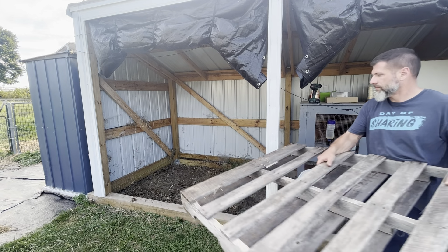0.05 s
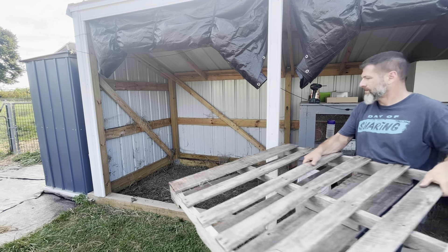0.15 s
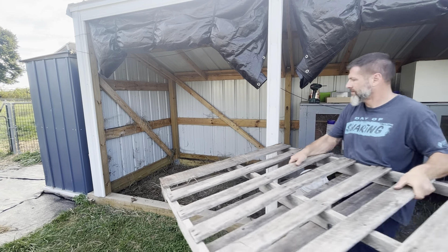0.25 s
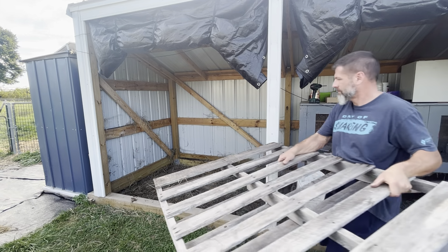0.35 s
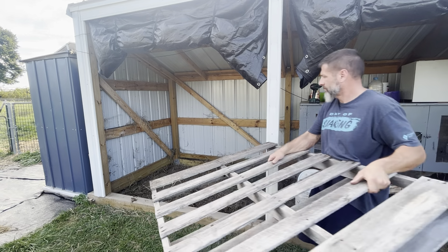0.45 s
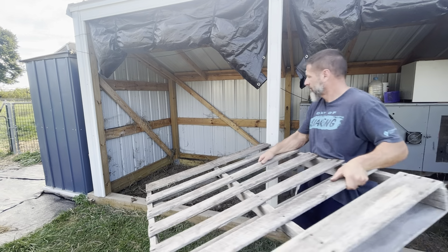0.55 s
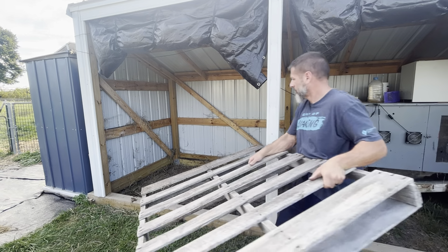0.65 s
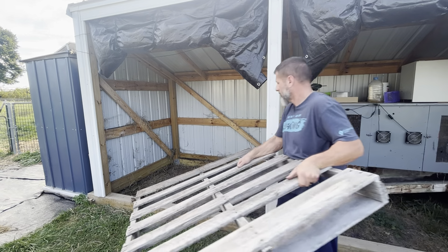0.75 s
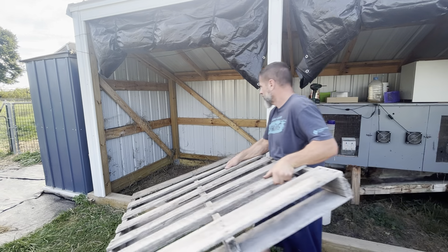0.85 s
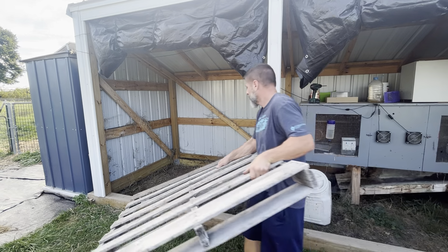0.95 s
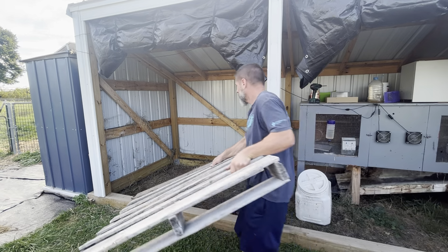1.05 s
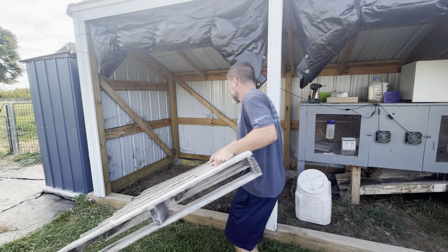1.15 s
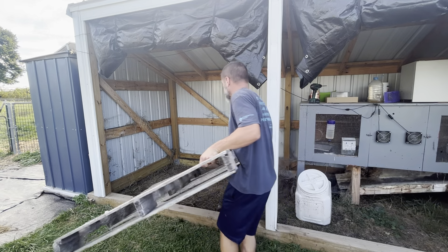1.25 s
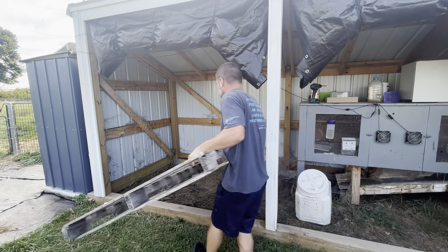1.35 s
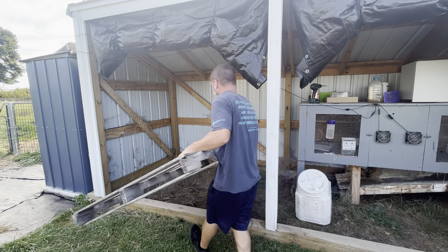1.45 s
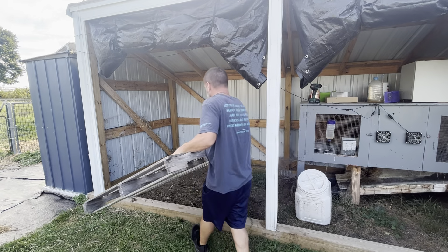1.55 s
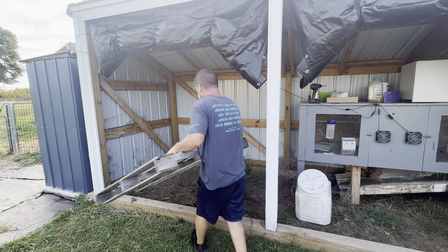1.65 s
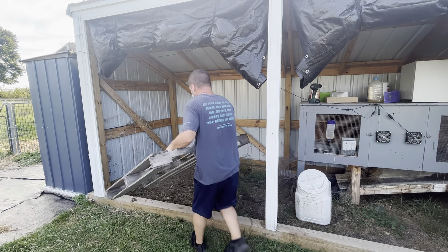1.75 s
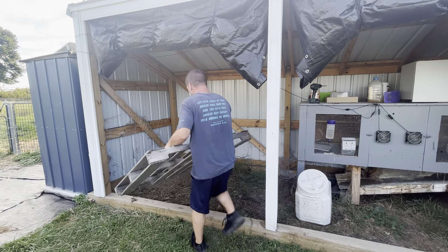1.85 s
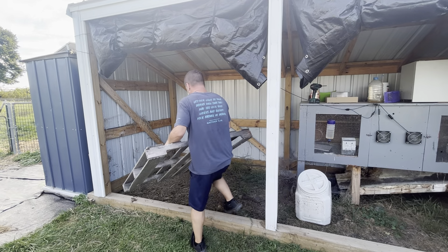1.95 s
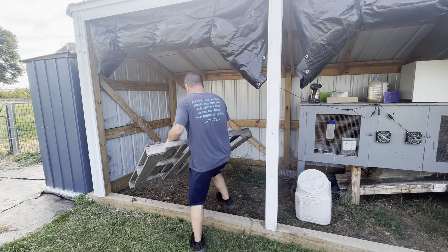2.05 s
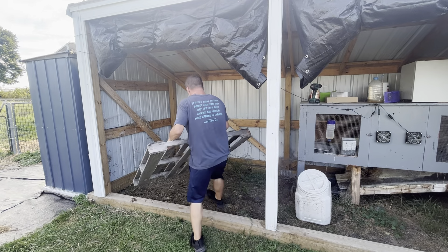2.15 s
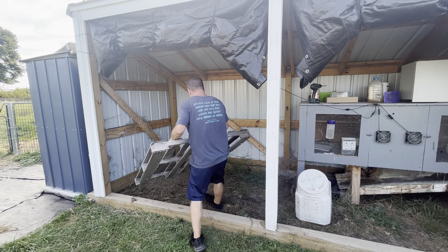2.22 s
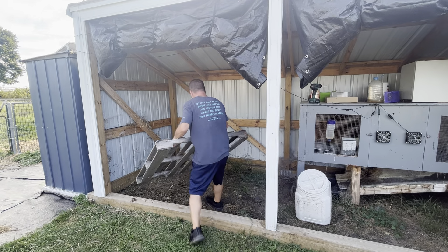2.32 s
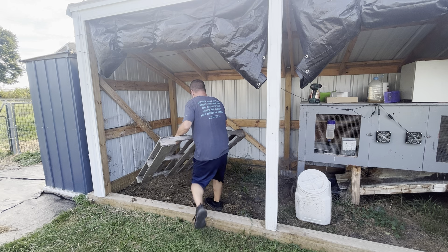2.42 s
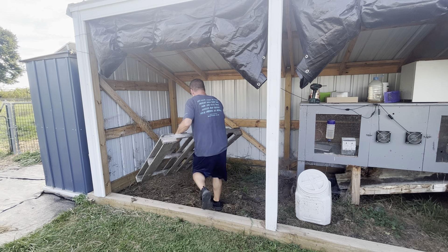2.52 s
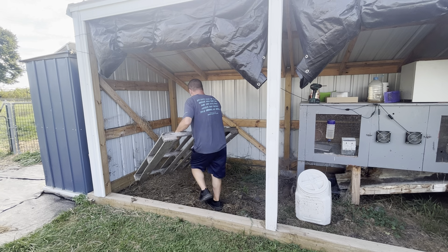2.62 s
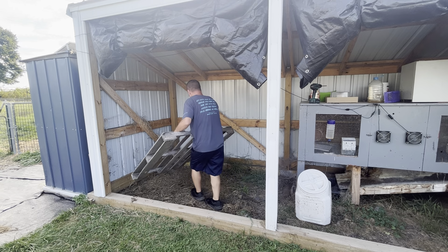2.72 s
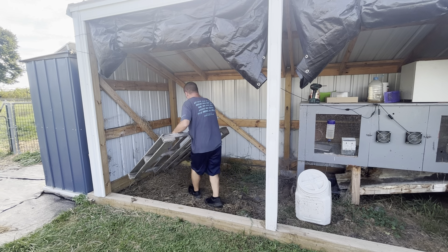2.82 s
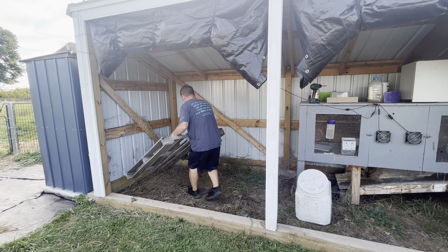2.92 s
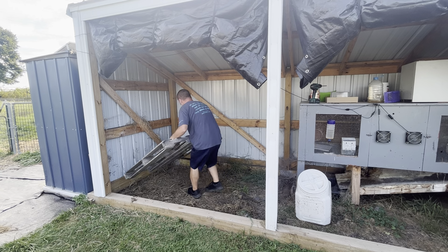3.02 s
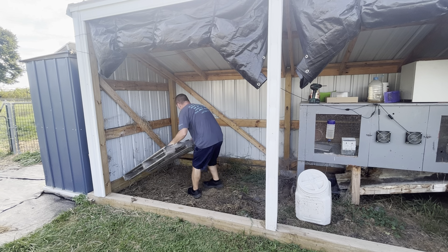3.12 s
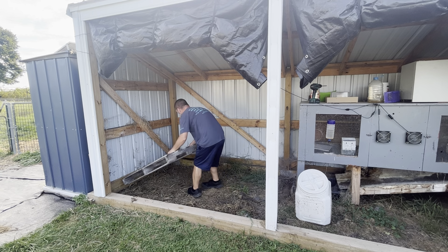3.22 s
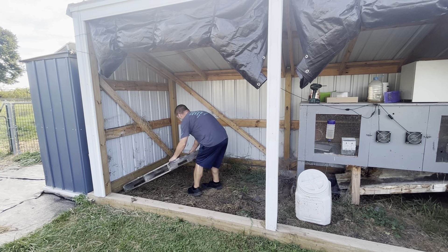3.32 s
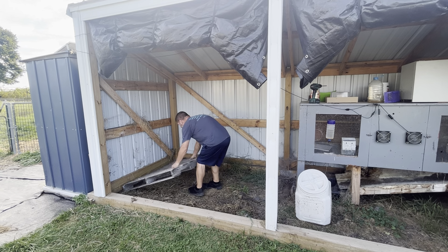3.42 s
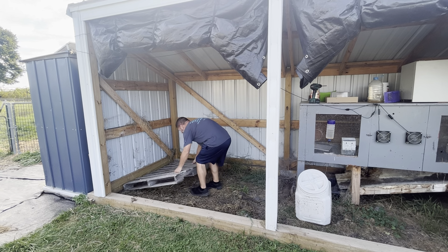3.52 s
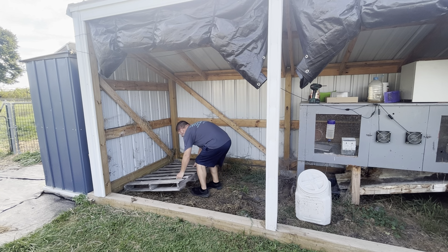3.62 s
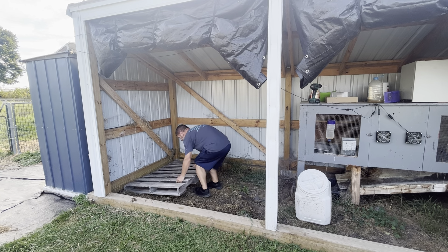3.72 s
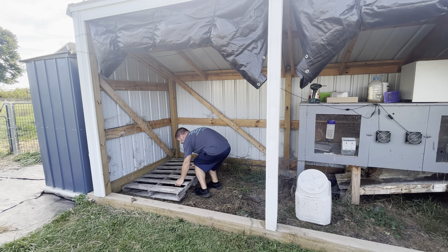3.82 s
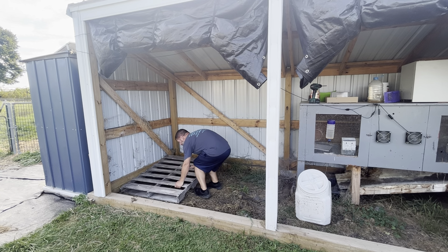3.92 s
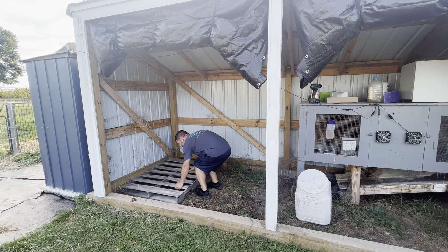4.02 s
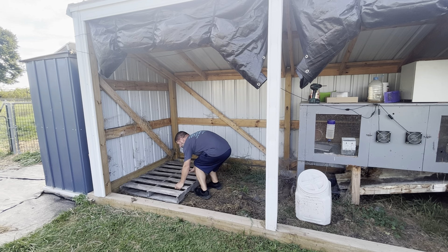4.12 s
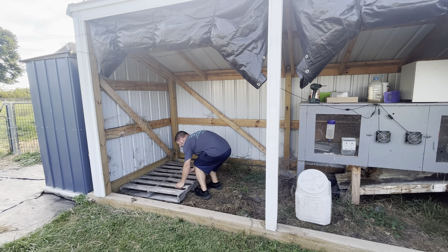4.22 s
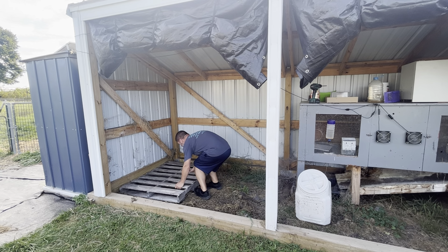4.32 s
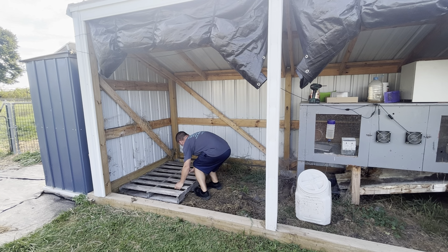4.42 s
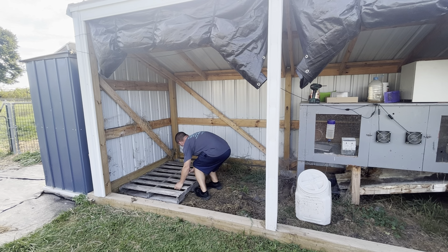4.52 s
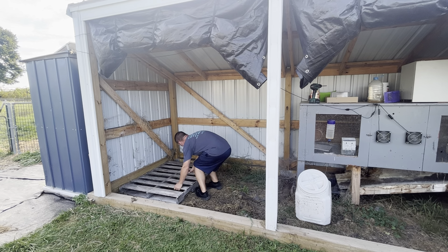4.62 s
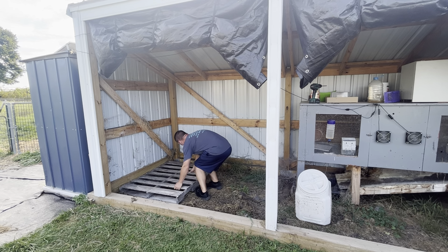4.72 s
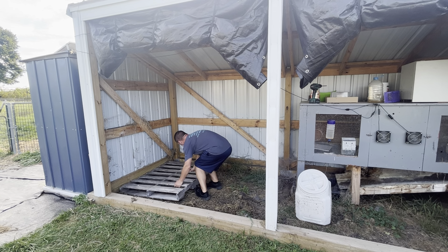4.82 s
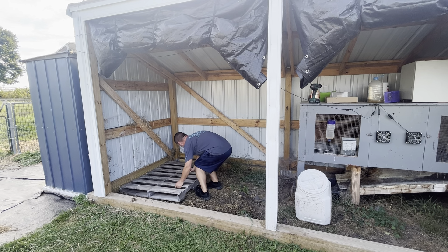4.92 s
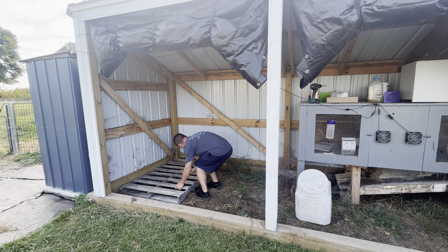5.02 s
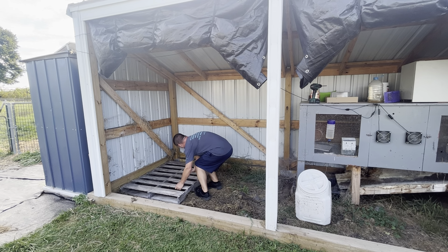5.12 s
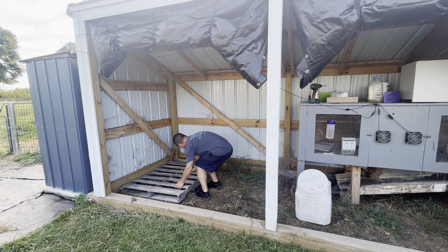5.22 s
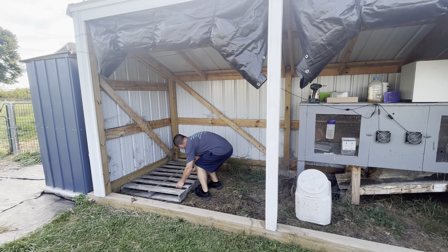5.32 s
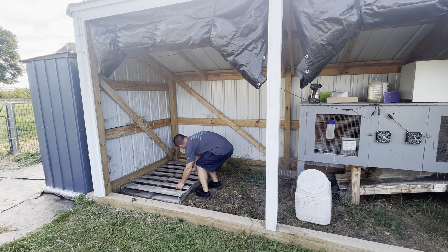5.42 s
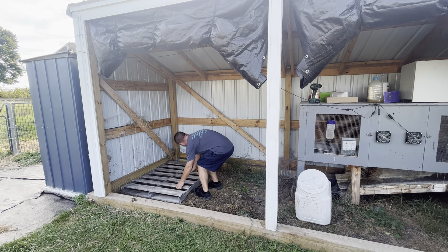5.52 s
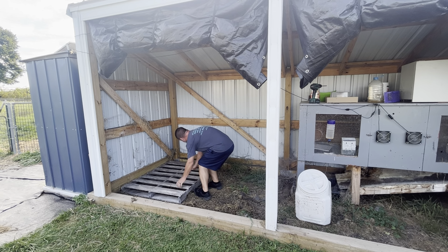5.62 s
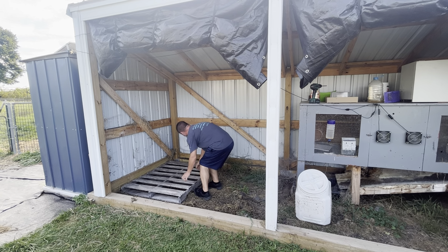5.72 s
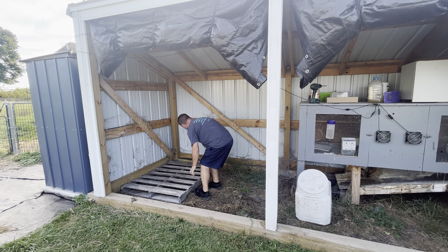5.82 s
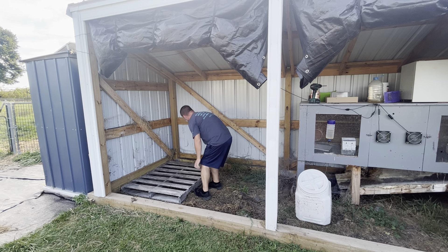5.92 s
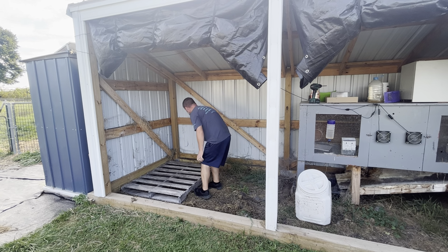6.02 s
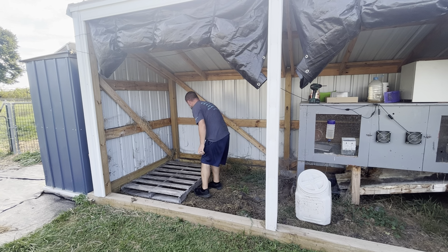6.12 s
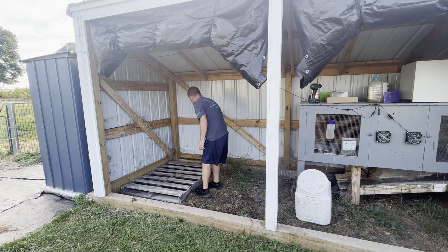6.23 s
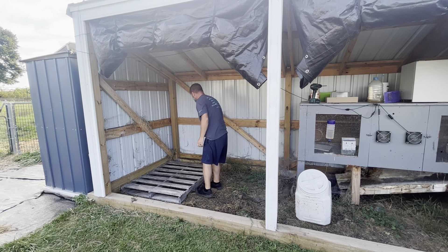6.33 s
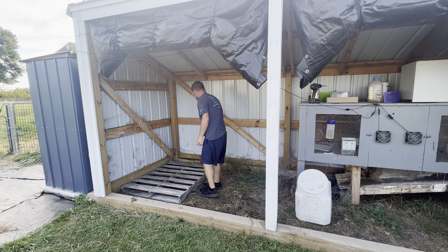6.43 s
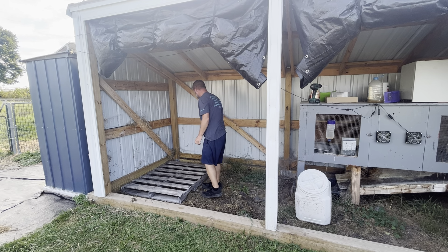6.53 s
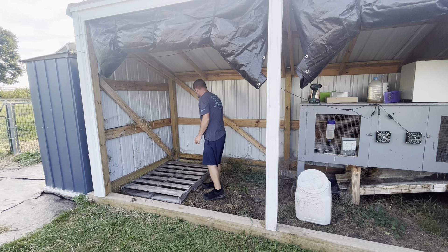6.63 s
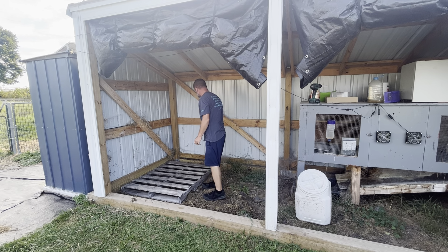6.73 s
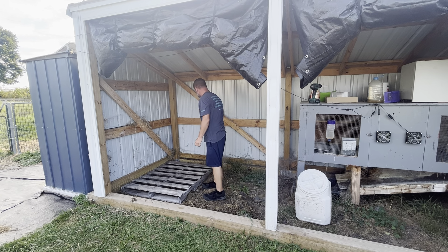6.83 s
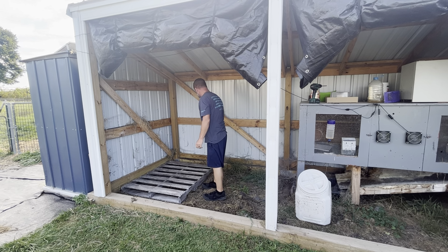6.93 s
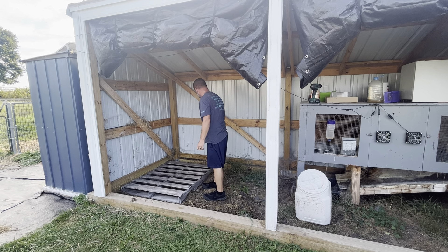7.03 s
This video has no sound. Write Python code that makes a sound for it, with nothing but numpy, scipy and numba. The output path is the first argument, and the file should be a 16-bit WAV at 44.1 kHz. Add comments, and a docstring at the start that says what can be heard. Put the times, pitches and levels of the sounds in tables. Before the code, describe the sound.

Throughout, a near cricket chirps about three times a second around 5 kHz, with softer crickets behind it, mostly left; a fast, thin trill near 8 kHz sits far right, pausing from about 4 to 4.5 s. A hazy insect chorus and low distant rumble lie underneath. From 0 to 2.7 s there are only very faint shuffles and dry ticks, with a light wooden clack at 2.76. Low bumps come at 3.0, then a sharp clack and scrape at 3.36. At 3.95 the wooden pallet slams onto dirt, the loudest event: a woody thud, clatter and booming metal walls ringing over a second. Small rattles and dull thumps follow at 4.25, 4.6 and 4.87. A crisp knock with a short scrape lands at 5.35, with soft bumps afterwards and a last low thump at 5.93. The boom fades and insects continue to 7 s.

```python
"""Crickets chirp and one trills to the right over a far insect chorus and a low rumble, all through the scene.
A wooden pallet is carried into an open sheet-metal shed, dropped on the dirt and nudged against the wall.
Each thud excites decaying pallet modes, a dense noise roar and slow booming modes of the wall sheets.
Slats clack as bursts of ticks into short modes; scuffs are dense grains under a faint high hiss.
Crickets are gliding tones, the chorus throbbing noise bands, the rumble and air wavering noise."""
import sys
import numpy as np
from scipy import signal
from scipy.fft import rfft, irfft, next_fast_len
from scipy.io import wavfile
from scipy.ndimage import uniform_filter1d
from numba import njit

SR = 44100
rng = np.random.default_rng(int(sys.argv[2]) if len(sys.argv) > 2 else 0)


def generate_wav(sig):
    """Save sig (samples, or channels by samples) to the path in sys.argv[1] as 16-bit PCM at SR."""
    pcm = np.round(np.clip(np.atleast_2d(sig).T, -1, 1) * 32767).astype(np.int16)
    wavfile.write(sys.argv[1], SR, pcm)


N = 311409

# Blows on the pallet. Each row: time in seconds, relative level in dB, contact corner in Hz,
# extra pallet level in dB, factor on the wall's ring length.
BLOWS = [(3.006, -41, 240, 13, 0.2), (3.018, -44, 300, 12, .2), (3.378, -35.5, 302, 14, 0.19),
         (3.495, -47.5, 450, 10.5, 0.23), (3.70, -48.5, 600, 5, 0.3), (3.725, -53, 700, 6, .3),
         (3.9474, -17, 1101, 10, 0.68), (4.249, -32.5, 300, -6, 0.63), (4.59, -40, 200.4, -1, 0.51),
         (4.861, -30.5, 417, 11.5, 0.56), (4.869, -37.5, 397, 17.5, .4), (4.882, -38.5, 347, 18.5, .4),
         (4.929, -32.5, 255, 13, 0.21), (5.325, -24.5, 606, 8, 0.56), (5.334, -33, 450, 15.5, .4),
         (5.347, -36, 350, 14, 0.44), (5.376, -41, 200, 4, .4), (5.42, -37, 350, 9, .3),
         (5.46, -38, 252, -6, 0.49), (5.537, -41, 255, 0, 0.5), (5.932, -35, 88.3, -10, 0.41)]
# Wing strokes of one near chirp. Each row: seconds from the chirp's time, relative level in dB,
# reference pitch in Hz; a faint late stroke trails.
NEAR_CHIRP = [(-.038, -1.5, 4960), (-.001, .8, 5080), (.04, 1.3, 5130), (.09, -12, 4900)]
# Wing strokes of one far chirp. Each row: seconds from the chirp's time, relative level in dB,
# reference pitch in Hz.
FAR_CHIRP = [(-.037, -0.5, 5480), (0, -0.5, 5600), (0.038, -0.5, 5600)]
SWELL_CYCLES = 14.3  # the sheets' build-up has a 60 dB time of this many periods, where the ring allows
DROP_S, DROP_DB = 5.76, -7  # the boom drops suddenly here


def undb(db):
    """Decibels to amplitude: 20 dB is a factor of ten."""
    return np.exp(np.asarray(db) * (np.log(10) / 20))


def level(x, db):
    """Scales a signal to an RMS level in dB."""
    return x * undb(db) / np.sqrt(np.mean(x ** 2))


def on_log(table, hz):
    """Interpolates (Hz, value) rows on a log-frequency axis."""
    f, v = np.transpose(table)
    return np.interp(np.log(np.maximum(hz, 1)), np.log(f), v)


def shape(x, response):
    """Linear filtering: multiplies the spectrum by a response given as a function of Hz."""
    size = next_fast_len(x.shape[-1] + SR // 4)
    f = np.arange(size // 2 + 1) * SR / size
    return irfft(rfft(x, size) * response(f), size)[..., :x.shape[-1]]


def walk(rate, size=N):
    """Random modulation: levels held 1 / rate s and slewed twice; spread near 1."""
    k = int(SR / rate)
    steps = np.repeat(rng.standard_normal(size // k + 1), k)
    return 1.8 * uniform_filter1d(uniform_filter1d(steps, k), k)[:size]


def add(out, x, s):
    """Superposition: adds x to out from s seconds on."""
    i = int(round(s * SR))
    a, b = max(i, 0), min(i + x.shape[-1], N)
    if b > a:
        out[..., a:b] += x[..., a - i:b - i]


def hiss(hz, width, order=2, channels=1):
    """Band-limited noise: a random spectrum around hz; a higher order has steeper skirts."""
    size = next_fast_len(N)
    f = np.arange(size // 2 + 1) * SR / size
    chance = rng.standard_normal((2, channels, len(f)))
    band = 1 + np.abs((f - hz) / (width / 2)) ** order
    return irfft((chance[0] + 1j * chance[1]) / band, size)[:, :N]


def scatter(x, t60, size, db):
    """Diffuse reflection: adds x convolved with a decaying noise tail, unlike in the two ports."""
    t = np.arange(size) / SR
    tail = rng.standard_normal((2, size)) * undb(-60 * t / t60)
    tail /= np.sqrt((tail ** 2).sum(1, keepdims=True))
    return x + signal.fftconvolve(x, tail, axes=1)[:, :N] * undb(db)


@njit
def ring(hz, gain, t60, size):
    """Modal superposition: struck modes are decaying sines, with one gain per channel."""
    out = np.zeros((2, size))
    for m in range(len(hz)):
        r, turn = np.exp(-np.log(1000) / (t60[m] * SR)), 2 * np.pi * hz[m] / SR
        a, b = 2 * r * np.cos(turn), r * r
        now, before = r * np.sin(turn), 0.
        for i in range(min(size, int(.8 * t60[m] * SR))):
            out[0, i] += gain[0, m] * now
            out[1, i] += gain[1, m] * now
            now, before = a * now - b * before, now
    return out


def pallet():
    """Dispersion: bending waves in the boards travel faster at high pitch, so each ring opens treble first."""
    # Modes of the boards. Each row: nominal frequency in Hz, relative level in dB, 60 dB decay in seconds.
    modes = [(178, -14, .12), (218, -15, .07), (273, 1, 0.045), (307.7, -4, 0.17), (360.3, 0, 0.1),
             (423, -4.5, 0.056), (468, -3.5, .07), (509, 0, 0.15), (563, -14, 0.048), (659, 1, .11),
             (786, -5, 0.082), (870, -9, 0.1), (968, -16, 0.06)]
    travel = 0.1443  # time of a bending wave along the boards at 1 Hz, s; falls as 1 / sqrt(Hz)
    ports_db = 1.8  # spread of each mode's level between ports
    out, (hz, db, t60) = np.zeros((2, N)), np.transpose(modes)
    for s, blow_db, corner_hz, share_db, _ in BLOWS:
        chance = rng.standard_normal((3, len(hz)))
        gain = undb(db + share_db + blow_db + ports_db * chance[1:]) / (1 + (hz / corner_hz) ** 2)
        wood = ring(hz * (1 + 0.0073 * chance[0]), gain, t60, SR // 4)

        def radiate(f):
            delay = np.exp(-4j * np.pi * travel * np.sqrt(f))
            open_slats = 1 + (140 / (f + 1)) ** 4  # they radiate no deep bass
            soft_contact = 1 + (f / (0.94 * corner_hz)) ** 4  # it excites little treble
            return delay / open_slats / soft_contact

        add(out, shape(wood, radiate), s - travel / np.sqrt(1500))  # 1500 Hz arrives on time
    return out


def sudden_drop():
    """Gain step: falls within 15 ms and stays down."""
    return undb(np.interp(np.arange(N) / SR, [DROP_S, DROP_S + .015], [0, DROP_DB]))


def wall_roar(wall_db=-9, unlike=0.89, rattle_db=1.5):
    """Statistical acoustics: modes too many to tell apart become third-octave noise, the bass swelling late."""
    # Wall spectrum. Each row: frequency in Hz, relative level per Hz in dB.
    spectrum = [(55, -16), (100, -14), (200, -16), (350, -12), (510, -12), (700, -16.5), (1400, -19),
                (3000, -21)]
    # Wall decay before each blow's factor. Each row: frequency in Hz, 60 dB decay in seconds.
    decays = [(30, 1.9), (80, 2.24), (210, 1.62), (550, 1.01), (1500, 1.38), (3000, 0.69)]
    out, t = np.zeros((2, N)), np.arange(N) / SR
    for hz in 44 * 2 ** np.arange(0, 6.3, 1 / 3):
        power = np.zeros(N)
        for s, blow_db, corner_hz, _, last in BLOWS:
            t60 = on_log(decays, hz) * last
            since = t[:int(t60 * SR)]
            rise = min(SWELL_CYCLES / hz, .7 * t60)
            swell = undb(-60 * since / t60) - undb(-60 * since / rise)
            add(power, (swell * undb(blow_db) / (1 + (hz / corner_hz) ** 2)) ** 2, s)
        apart = np.clip(unlike * np.log2(hz / 100) / 3, 0, 1)  # the ports hear the bass alike
        band_db = wall_db + on_log(spectrum, hz) + 10 * np.log10(hz / 9)
        noise = level(hiss(hz, hz / 4, order=4, channels=3), band_db)
        out += (np.sqrt(1 - apart ** 2) * noise[0] + apart * noise[1:]) * np.sqrt(power)
    return out * sudden_drop() * undb(rattle_db * walk(70))  # loose boards rattle the roar


def wall_boom(boom_db=-22, chatter_db=2.5):
    """Plate resonance: whole sheets flap in a few low modes that swell, then decay slowly."""
    # Flapping modes. Each row: frequency in Hz, relative level in dB,
    # 60 dB decay in seconds before each blow's factor.
    modes = [(43, 8.5, 4.9), (93, 13, 1.34), (111.8, 7, 1.2), (178, 1, 1.4), (305, 2, .9)]
    out, (hz, db, t60) = np.zeros((2, N)), np.transpose(modes)
    drop = sudden_drop()
    for s, blow_db, corner_hz, _, last in BLOWS:
        size = int(np.clip(3 * last, .5, 3) * SR)
        sign = np.sign(rng.standard_normal(len(hz)))
        gain = sign * undb([db + boom_db + blow_db] * 2) / (1 + (hz / corner_hz) ** 2)
        rise = np.minimum(SWELL_CYCLES / hz, .7 * t60 * last)
        wall = ring(hz, gain, t60 * last, size) - ring(hz, gain, rise, size)
        boom = np.zeros((2, N))
        add(boom, wall * undb(chatter_db * walk(30, size=size)), s)
        out += boom if s > DROP_S else boom * drop  # a later blow booms in full
    return out


def clacks(rate=4000):
    """Stick-slip excitation: a skid is a burst of uneven ticks into the slat modes; the shed smears it."""
    # Clacks and skids. Each row: start in seconds, relative level in dB, rise in seconds,
    # length in seconds (fall to 1/e), brightness in dB per octave.
    skids = [(1.637, -58.5, 0.005, .04, 1.5), (2.233, -51.5, .003, 0.027, -1.5),
             (2.757, -41.5, 0.00052, 0.0057, 1), (2.769, -45, 0.0089, 0.043, -3.5),
             (3.07, -55, .002, .015, 6), (3.122, -52.5, .003, .01, 2), (3.35, -41, .003, 0.0061, 8),
             (3.357, -27.5, .003, 0.0058, 4), (3.364, -27.5, .002, .006, 0.5),
             (3.376, -32, .003, 0.017, -1), (3.461, -45.5, .003, 0.015, -2),
             (3.484, -45.5, .003, 0.032, -5), (3.535, -50, .002, 0.01, 7), (3.948, -31, .001, .006, 10),
             (3.948, -20.5, .002, 0.1, -5.5), (4.034, -34, .003, .015, -3), (4.086, -37.5, .004, .025, 4),
             (4.178, -37.5, .002, 0.013, 0.5), (4.162, -39, .01, 0.17, -3), (4.244, -40, .002, .012, -1),
             (4.278, -43.5, .002, .02, 1), (4.31, -49, .01, .07, 0), (5.3705, -33, .001, .004, 14),
             (5.372, -23.5, 0.0022, 0.007, 11), (5.381, -30, .002, .014, 5), (5.736, -53, .004, 0.02, -8)]
    # Slat modes. Each row: nominal frequency in Hz, relative level in dB, 60 dB decay in seconds.
    modes = [(371, 4, 0.028), (723, 1.5, 0.02), (893, 2.5, 0.019), (1116, 3, 0.017), (1245, 0, .017),
             (1420, -0.5, 0.017), (1540, 0.5, 0.014), (1775, 3, 0.014), (2100, -0.5, 0.014),
             (2550, -2, .01), (2790, -6.5, 0.01), (3130, -8, 0.0089), (3330, -9.5, .008),
             (3800, -15, 0.005), (4300, -22, .005), (5200, -24, .006)]
    out, (hz, db, t60) = np.zeros((2, N)), np.transpose(modes)
    t = np.arange(SR // 2) / SR
    for s, blow_db, rise, length, tilt_db in skids:
        chance = rng.random((3, len(t)))
        ticks = (chance[0] < rate / SR) * (chance[1] - .5) * chance[2] ** 2
        ticks = ticks * np.minimum(t / max(rise, 1e-4), 1) * np.exp(-(t / length) ** 2)
        spread_db = 1.7 * rng.standard_normal(len(hz)) + 2.0 * rng.standard_normal((2, len(hz)))
        gain = undb(db + tilt_db * np.log2(hz / 1000) + spread_db)
        gain *= (-1) ** np.arange(len(hz))  # neighbouring modes swing against each other
        body = ring(hz * (1 + 0.014 * rng.standard_normal(len(hz))), gain, t60, SR // 8)
        x = signal.fftconvolve(ticks[None], body, axes=1)
        add(out, x / np.abs(x).max() * undb(blow_db + 10.5), s)
    return scatter(out, .25, SR // 2, -12)


def scuffing(rate=5000, spread_db=1.45):
    """Granular friction: dense random grains with a woody middle and a faint high hiss swell and die away."""
    # Scuffs of shoes, slats and grit. Each row: peak time in seconds, relative level in dB,
    # relative level of the high hiss in dB, 60 dB rise in seconds, 60 dB fall in seconds.
    scuffs = [(.1, -67.5, 1.5, 2, .9), (.7, -77, 6, 0.1, .9), (.98, -67.5, -4, 2, 0.5),
              (1.49, -64.5, 4.5, 0.3, .5), (1.65, -65.5, -14, 0.8, 0.5), (2.24, -59.5, -1, 0.28, 0.36),
              (2.37, -63.5, -3, 0.5, .7), (2.72, -78, 18, 0.1, .4), (2.77, -45.5, -1.5, 0.05, 0.22),
              (2.86, -65.5, 5.5, 0.44, 1), (3.015, -58, 4, .08, .3), (3.125, -56, -3, 0.4, .22),
              (3.22, -68.5, 3, .5, 1), (3.365, -32.5, -16, 0.0357, 0.14), (3.43, -53.5, -9, 0.17, 0.6),
              (3.53, -56, -5, 0.35, 0.07), (3.9, -51.5, -2.5, 1.5, 0.5),
              (3.954, -31.5, -16.5, 0.0754, 0.77), (4.17, -45, -18, 0.66, 0.79),
              (4.61, -52.5, -8, 0.26, .3), (4.75, -64.5, -3, 0.6, .8), (4.88, -53.5, -14, 0.23, 0.26),
              (5.02, -52.5, -7.5, .5, 0.32), (5.31, -60, -3.5, 1.5, .6), (5.39, -34, -34, 0.16, 0.16),
              (5.45, -52.5, -24, 0.32, 0.7), (6.66, -73, 2, 2.1, 1.5)]
    t, (loud, hissing) = np.arange(N) / SR, np.zeros((2, N))
    for s, db, hiss_db, rise, fall in scuffs:
        gain = undb(db - 60 * np.where(t < s, (s - t) / rise, (t - s) / fall))
        loud, hissing = loud + gain, hissing + gain * undb(hiss_db)
    grains = (rng.random((3, N)) < rate / SR) * rng.standard_normal((3, N))
    grains = grains * undb(spread_db * rng.exponential(size=(3, N)))
    # one part common to both ports, one grainy and one smooth part for each
    grains = grains[0] + 0.49 * grains[1:] + 0.71 * rng.standard_normal((2, N))
    woody = [(200, -8), (600, 4.0), (1500, 2.0), (3000, -2.5), (6000, -13), (12000, -29)]  # (Hz, dB)
    high = [(4000, -37), (7000, 1), (10000, 0.0), (14000, -7.5), (14800, -30.5)]  # (Hz, dB)
    middle = level(shape(grains, lambda f: undb(on_log(woody, f))), 1.26)
    high_hiss = level(shape(grains, lambda f: undb(on_log(high, f))), 1.8)
    return loud * middle + hissing * high_hiss


def snaps():
    """Impulsive fracture: grit or splinters give one short, bright, decaying noise tick each."""
    # Tiny dry snaps. Each row: start in seconds, relative level in dB.
    ticks = [(1.5863, -38), (2.0994, -59), (2.4894, -55), (3.1687, -41), (3.598, -42)]
    out, t = np.zeros(N), np.arange(SR // 100) / SR
    for s, db in ticks:
        add(out, rng.standard_normal(len(t)) * undb(db + 1.5 - 60 * t / 0.0086), s)
    bright = [(1500, -21), (4000, -9), (10000, 4.0), (15000, -7)]  # (Hz, dB)
    return shape(out, lambda f: undb(on_log(bright, f)))


def shade_left(shed):
    """Acoustic shadowing: the shed lies nearer the right port; the left hears it later and shaded."""
    # Lag of the left port. Each row: frequency in Hz, phase in radians.
    lag = [(0, 0), (480, -1.3), (760, -5.2), (2070, -6.8), (4500, -6.3)]
    # Shading of the left port. Each row: frequency in Hz, gain in dB.
    shade = [(100, -.3), (200, -1.0), (350, -4.5), (550, -8), (1200, -6.5), (2200, -.5), (4400, 0),
             (8000, -5), (15000, -1)]

    def response(f):
        return undb(on_log(shade, f)) * np.exp(1j * np.interp(f, *np.transpose(lag)))

    shed[0] = shape(shed[0], response)
    return shed


def stroke(from_hz, to_hz, length, rise, lift_hz=0., rough_db=1.5):
    """Stridulation: a wing stroke is a grainy tone that swells, lifts into pitch, slides down and stops."""
    u = np.arange(int(length * SR)) / (length * SR)
    grain = undb(rough_db * np.interp(u, np.linspace(0, 1, 12), rng.standard_normal(12)))
    # the integral of a pitch that starts lift_hz low and slides towards to_hz
    turns = length * (from_hz * u + (to_hz - from_hz) * u ** 3 / 3 + lift_hz * (1 - u) ** 4 / 4)
    return grain * np.sin(np.pi * u ** rise) * np.sin(2 * np.pi * (turns + rng.random()))


def pan(left_db, right_db):
    """Level difference between the ports: a column of decibels, left above right."""
    return np.array([[left_db], [right_db]])


def near_cricket(out):
    """Pulsed stridulation: three strokes a chirp rise in level and pitch, then a faint one follows."""
    # Chirps of the nearer cricket: time of the middle stroke in seconds.
    chirps = [-.042, .281, .634, .915, 1.282, 1.605, 1.903, 2.257, 2.548, 2.881, 3.178, 3.464, 3.79, 4.3,
              4.613, 4.988, 5.264, 5.68, 5.963, 6.311, 6.602, 6.951]
    for s in chirps:
        for lag, step_db, hz in NEAR_CHIRP:
            db = -45 + step_db + rng.normal(0, .9) + pan(1.7, -1.8)
            add(out, stroke(hz, hz - 760, 0.025, 0.8, lift_hz=120, rough_db=1.0) * undb(db), s + lag)


def far_cricket(out):
    """Pulsed stridulation: a softer, higher cricket with three even strokes a chirp."""
    # Chirps of the farther cricket: time of the middle stroke in seconds.
    chirps = [.105, .4, .916, 1.351, 1.638, 1.999, 2.331, 2.676, 2.975, 3.681, 5.23, 5.945, 6.253, 6.888]
    for s in chirps:
        for lag, step_db, hz in FAR_CHIRP:
            db = -58.5 + step_db + rng.normal(0, 1.2) + pan(.5, -.5)
            add(out, stroke(hz, hz - 350, 0.02, 0.92) * undb(db), s + lag)


def third_cricket(out):
    """Pulsed stridulation: a rougher cricket on the left joins for a while."""
    # Chirps of the third cricket. Each row: time of the middle stroke in seconds, relative level in dB.
    chirps = [(1.82, -55), (2.146, -51), (2.48, -51), (2.805, -51), (3.13, -55), (3.425, -51)]
    for s, chirp_db in chirps:
        for lag, step_db, hz in NEAR_CHIRP[:3]:
            db = chirp_db + step_db + rng.normal(0, 1.5) + pan(2.5, -5.0)
            add(out, stroke(hz - 60, hz - 500, 0.0218, .8, rough_db=2.5) * undb(db), s + lag)


def distant_crickets(out):
    """Random superposition: crickets further out chirp at uneven times, mostly to the left."""
    for s, pitch, size in rng.random((22, 3)):
        for lag, step_db, _ in FAR_CHIRP:
            db = -56.0 + 3.3 * size + step_db + pan(2.5, -4.0)
            x = stroke(4900 + 250 * pitch, 4500 + 250 * pitch, 0.0208, 1.0)
            add(out, x * undb(db), s * N / SR + lag)


def trill(out):
    """Sustained pulse train: strokes follow evenly; a cold start is quicker, lower and softer."""
    # Phrases. Each row: start in seconds, end in seconds, settled stroke period in seconds,
    # time gained by a hurried start in seconds, warm-up in seconds, warm relative level in dB.
    phrases = [(.038, .23, .058, 0, .005, -37), (.773, 3.98, .05637, .013, 1.6, -36.5),
               (4.556, 7.07, .05596, .0225, .9, -34.5)]
    hurry_strokes = 2.8  # strokes over which the hurry eases to 1/e
    warm_hz, cold_hz, cold_db = 8170, -200, -7  # reference pitch; offsets at the cold start
    for start, end, period, gained, warm_up, warm_db in phrases:
        count = np.arange(int((end - start + gained) / period) + 1)
        for t in period * count - gained * (1 - np.exp(-count / hurry_strokes)):
            cold, chance = np.exp(-t / warm_up), rng.standard_normal(2)
            f = warm_hz + cold_hz * cold
            db = warm_db + cold_db * cold + 1.1 * chance[0] + pan(-19.0, 0)
            x = stroke(f + 60, f - 120, 0.0175, 1.05, lift_hz=150, rough_db=.8)
            add(out, x * undb(db), start + t - .007 + 0.0015 * chance[1])


def crickets():
    """Outdoor scattering: grass and walls add a short diffuse tail to the chirps and trill."""
    out = np.zeros((2, N))
    for sing in (near_cricket, far_cricket, third_cricket, distant_crickets, trill):
        sing(out)
    return scatter(out, 0.18, SR // 5, -13)


def chorus():
    """Incoherent summation: many far insects blur into throbbing noise bands."""
    # Bands of the chorus. Each row: centre in Hz, width in Hz, left level in dB, right level in dB,
    # throb in dB.
    bands = [(4840, 860, -57, -62, 1.5), (8260, 730, -59.5, -60, 1.5), (8420, 1770, -61.5, -51.5, 1.14)]
    out = np.zeros((2, N))
    for hz, width, left_db, right_db, throb_db in bands:
        for ear, db in enumerate((left_db, right_db)):
            out[ear] += level(hiss(hz, width, order=4)[0] * undb(throb_db * walk(40)), db)
    return out


def air():
    """Diffuse field: far traffic and wind as swelling half-octave noise, alike in both ports in the bass."""
    # Spectrum of the air. Each row: frequency in Hz, relative level per Hz in dB.
    spectrum = [(20, -32), (45, -9), (65, -5), (130, -4.5), (200, -14), (300, -16.5), (500, -27),
                (1000, -27), (1500, -23), (1850, -25), (2150, -43), (2800, -47.5), (4000, -45.5),
                (6700, -83.5), (11000, -62), (15000, -72)]
    out, swell, t = 0, walk(0.9), np.arange(N) / SR
    for hz in 22 * 2 ** np.arange(0, 9.6, .5):
        mid, side = hiss(hz, hz / 3, channels=2)
        recede_db = -0.52 * (t - 3) * (hz > 400)  # far traffic slowly recedes, dB per s
        db = on_log(spectrum, hz) + .5 * swell + 0.53 * walk(2) + recede_db
        out = out + undb(db) * (mid + min(hz / 350.0, 1.1) * side * np.array([[1], [-1]]))
    return level(out, -55)


def rumble():
    """Energy addition: a wavering hum and drone of narrow noise, and every thud stirs both bands."""
    # Wavering of the unstirred rumble. Each row: time in seconds, relative hum level in dB,
    # relative drone level in dB.
    waver = [(0, -55, -62.5), (.25, -50.5, -60), (.53, -51, -67.5), (1.16, -61.5, -54), (1.59, -52, -58),
             (1.81, -69, -60.5), (2.18, -53, -77), (2.65, -61, -81), (3.85, -53.5, -65), (6.02, -51.5, -64),
             (6.53, -51, -53.5), (7.06, -52, -60.5)]
    # Stirring by a thud, hum row then drone row. Each row: level relative to the thud in dB,
    # swell in seconds, 60 dB decay in seconds.
    stir = [(-19.5, 0.097, 1.03), (-22.5, .12, 1.35)]
    out, t = 0, np.arange(N) / SR
    s, *far_db = np.transpose(waver)
    for hz, width, db, (under_db, rise, t60) in zip((90.6, 191.2), (15.0, 50.), far_db, stir):
        power = undb(2 * np.interp(t, s, db))
        for when, blow_db, *_ in BLOWS:
            since = np.maximum(t - when, 0)
            fall_db = -60 * np.maximum(since - rise, 0) / t60
            stirred = np.minimum(since / rise, 1) ** 2 * undb(blow_db + under_db + fall_db)
            power = power + stirred ** 2
        out = out + level(hiss(hz, width), 0) * np.sqrt(power)
    return out * undb(pan(-.7, .7))


def scene():
    """Superposition of the shaded shed sounds and the outdoor sounds."""
    shed = pallet() + wall_roar() + wall_boom() + clacks() + scuffing() + snaps()
    return shade_left(shed) + crickets() + chorus() + air() + rumble()


def record(dry):
    """Band-limiting and soft saturation: cuts the lowest bass, rounds the peaks and cuts the top."""
    dry = signal.sosfilt(signal.butter(2, 25, "high", fs=SR, output="sos"), dry)
    dry = dry / (1 + np.abs(dry / .95) ** 4) ** .25
    return signal.sosfilt(signal.ellip(8, .2, 70, 15000, fs=SR, output="sos"), dry)


dry = scene()
out = record(dry)
generate_wav(out)
```